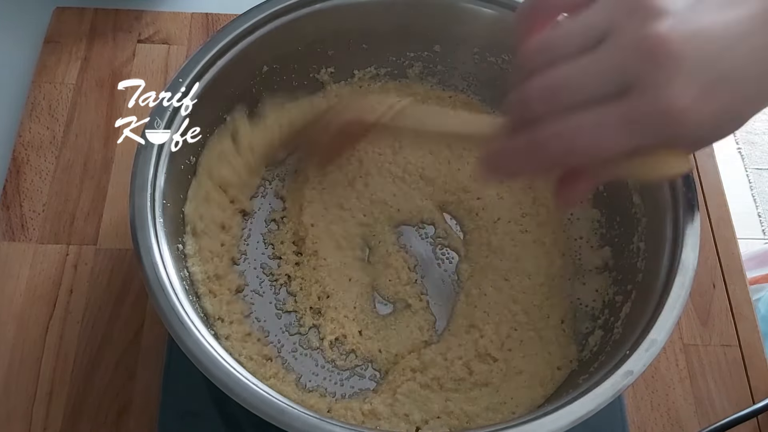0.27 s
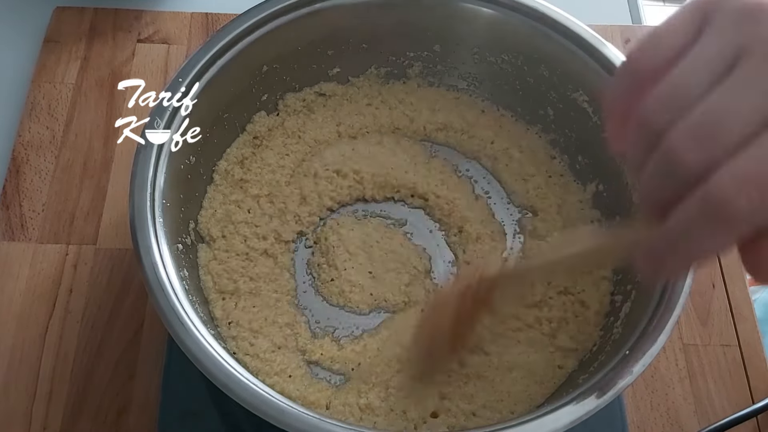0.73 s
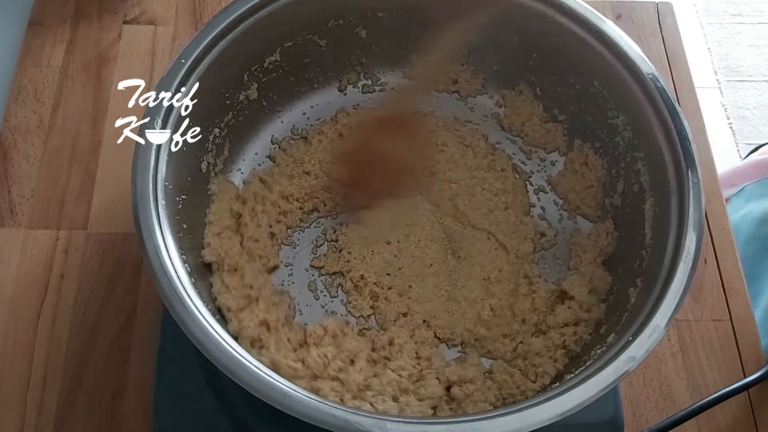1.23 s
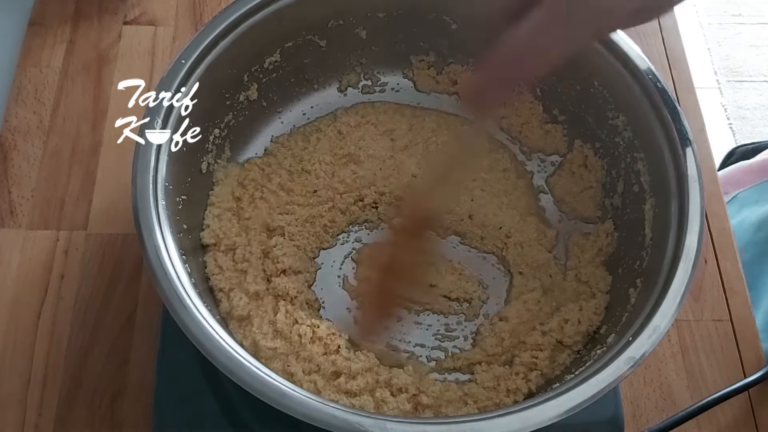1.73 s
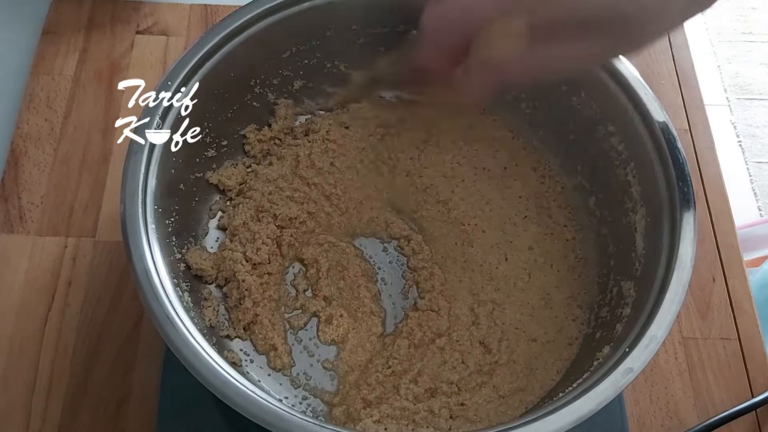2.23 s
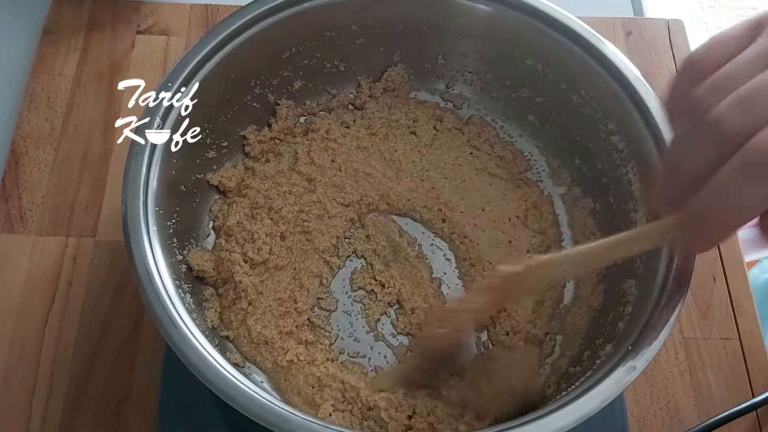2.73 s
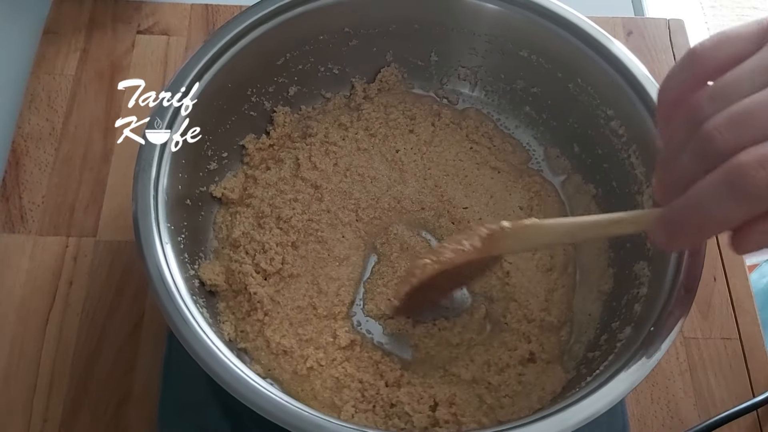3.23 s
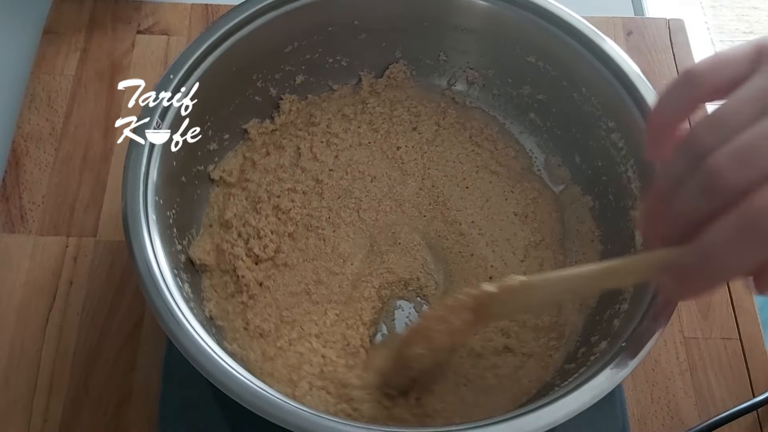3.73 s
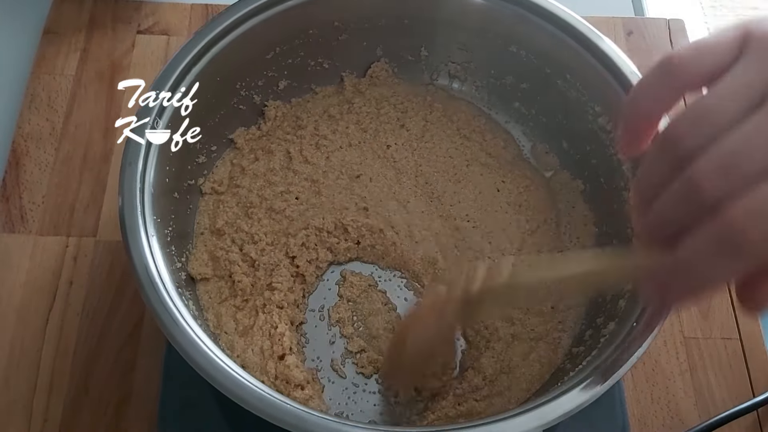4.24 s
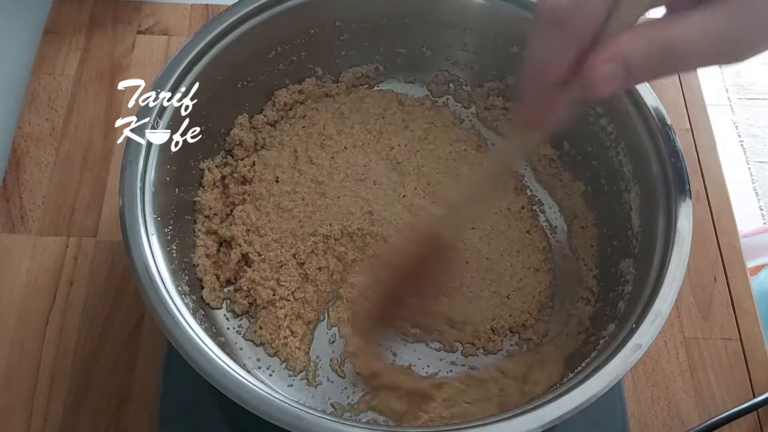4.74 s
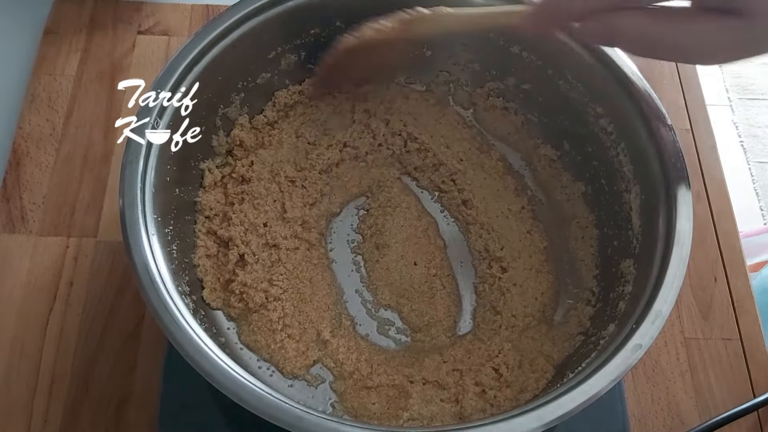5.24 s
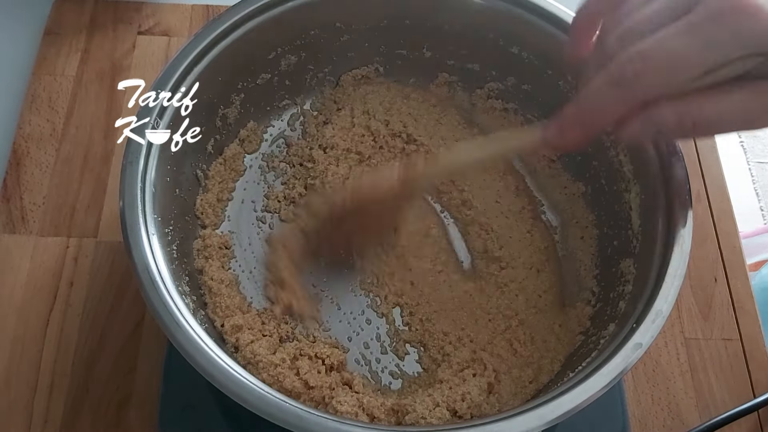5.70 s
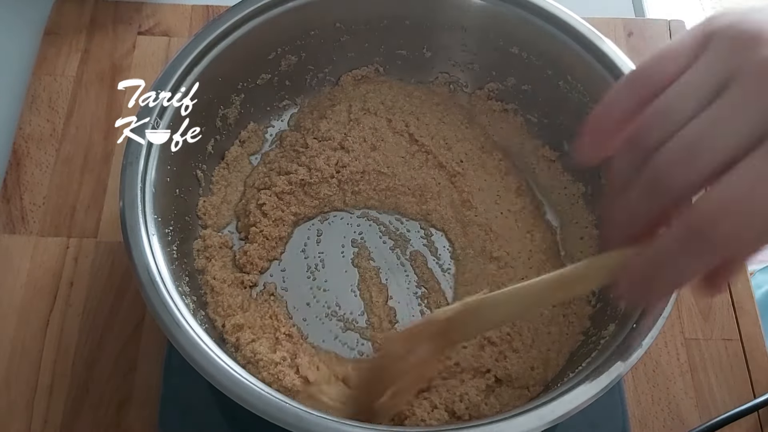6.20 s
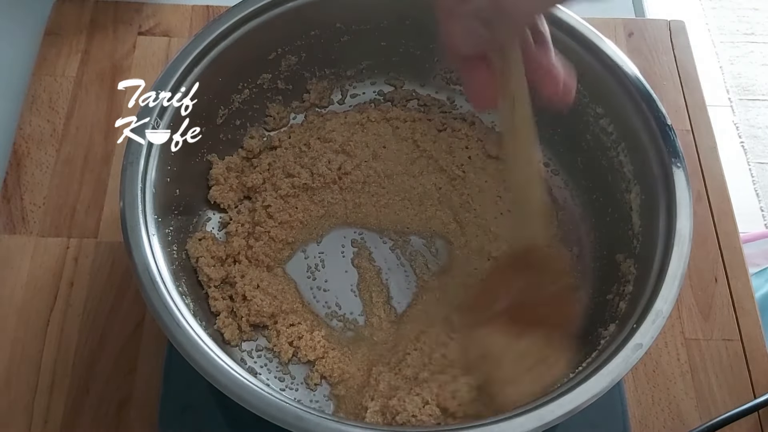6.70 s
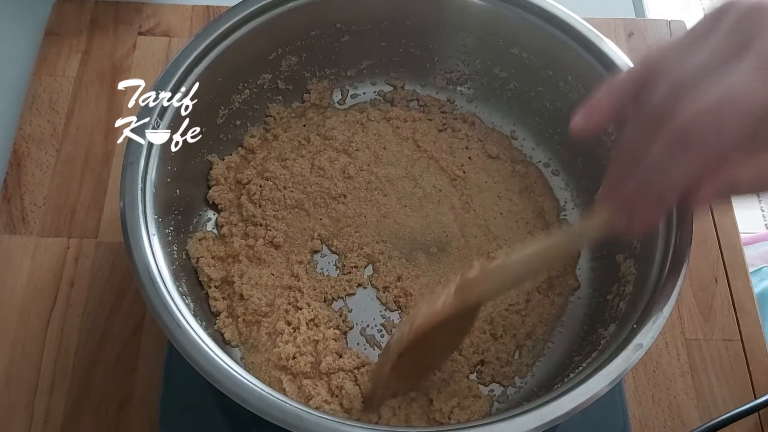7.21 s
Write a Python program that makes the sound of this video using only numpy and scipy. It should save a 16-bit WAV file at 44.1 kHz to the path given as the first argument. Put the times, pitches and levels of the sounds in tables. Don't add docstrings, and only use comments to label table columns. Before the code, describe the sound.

A wooden spoon stirs crackling grain in a steel pot, with soft thuds and two sharp clacks over a steady gas hiss.

```python
import sys
import numpy as np
from scipy import signal
from scipy.fft import rfft, irfft, next_fast_len
from scipy.io import wavfile
from scipy.ndimage import uniform_filter1d

SR = 44100
rng = np.random.default_rng(int(sys.argv[2]) if len(sys.argv) > 2 else 0)


def dump(signal):
    limited = np.clip(np.atleast_2d(signal).T, -1, 1)
    pcm = np.round(limited * 32767).astype(np.int16)
    wavfile.write(sys.argv[1], SR, pcm)


def nominal_scale(level):
    x = np.asarray(level, float) / 20
    return 10 ** x


N = 328986
T = np.arange(N) / SR

# (frequency [Hz], density [dB per Hz])
GAS_SPECTRUM = [(30, -40), (60, -17), (115, -10.5), (300, -5), (600, -13.5), (1000, -36), (3000, -31),
                (6000, -21.5), (15800, -20.5)]
# (frequency [Hz], bandwidth [Hz], level [dB])
JET_WHISTLES = [(1820, 520, -6.5), (4260, 480, -4), (7400, 130, 8.5), (11600, 3000, -5), (14240, 500, -5)]
# (frequency [Hz], density [dB per Hz])
SIZZLE_SPECTRUM = [(1500, -30), (4000, -9), (6000, 1), (9000, -5), (15000, -10)]
# (time [s], peak [dB], length [ms])
PUFFS = [(1.12, -34.5, 24), (1.214, -32, 39), (1.254, -29.5, 23), (1.331, -33, 15), (1.342, -26.5, 24),
         (1.378, -25.5, 21), (1.414, -22, 29), (1.429, -31, 40), (1.56, -37.5, 29), (1.64, -28, 33),
         (1.665, -24.5, 24), (1.69, -32.5, 26)]
# (frequency [Hz], density [dB per Hz])
CRACKLE_SPECTRUM = [(300, -4.5), (600, -13), (1000, -14), (1500, -7), (2500, -7), (4300, -3.5), (6500, -1),
                    (8700, -3.5), (12500, -0.5), (15800, -5)]
# (frequency [Hz], density [dB per Hz])
CRACK_SPECTRUM = [(500, -34), (1500, -18), (3000, -18), (4000, -15), (4650, -21), (5400, -5.5), (7000, 2),
                  (8000, -4.5), (9000, -11.5), (12000, -14), (16500, -19.5)]

# (frequency [Hz], level [dB], t60 [s])
HOB_MODES = [(61.7, -24, 0.13), (99.2, 0.5, 0.23), (127.6, -3.5, 0.27), (185.1, -12, 0.3)]
# (frequency [Hz], level [dB], t60 [s])
BOTTOM_MODES = [(135.7, 1.5, 0.18), (275, -17.5, 0.64), (313.7, 0, 0.22), (357, -4, 0.24),
                (419, -5.5, 0.17), (537, -4.5, 0.25), (610, -4, 0.15), (712, -8.5, 0.23),
                (828, -11.5, 0.23)]
# (frequency [Hz], level [dB], t60 [s])
WALL_MODES = [(630, 0, 0.019), (735, -5.5, 0.022), (960, -11, 0.014), (1204, 1, 0.013), (1496, -8.5, .04),
              (1691, -3, 0.021), (1950, -6.5, 0.016), (2270, -8.5, 0.024), (2730, -0.5, 0.01)]
# (frequency [Hz], level [dB], t60 [s])
RIM_MODES = [(1490, -23, 0.23), (2360, -14, 0.22), (2550, -8, 0.08), (3300, -14, 0.12), (3740, -14, 0.12),
             (4050, -11, .06), (5040, -12.5, 0.097), (5450, -3, 0.083), (6340, 14, 0.08), (6780, 10, 0.11),
             (7700, -10, .08), (7040, 6, 0.08)]
# (frequency [Hz], level [dB], t60 [s])
BELL_MODES = [(851, -8, 0.57), (1330, -8.5, 0.3), (1475, -3, 0.46), (1780, -5, .26), (2355, 3.5, .47),
              (2570, -13, 0.42), (2950, -14, .3), (3246, -2, 0.35), (3666, -3, 0.12), (4050, -5, 0.45)]

# (time [s], peak [dB], deep mode [dB], upper modes [dB], decay stretch [ratio])
THUDS = [(0.303, -31, -25, -23, 1.2), (0.901, -26, -31, -9, 0.85), (0.929, -27.5, -17.5, -11, 0.99),
         (1.426, -29.5, -12, -15, 0.87), (1.475, -24.5, -6.5, -7.5, 1), (1.504, -30, -22, -14, 1.1),
         (2.228, -35, -20, -6, 1.5), (2.668, -32.5, -24, -5.5, 0.83), (3.261, -21.5, -9, -32, 1.2),
         (4.383, -23.5, -12, -3, 1), (4.409, -22, -20, -14, 1.6), (5.347, -40, -28, -9.5, 1.4),
         (5.369, -29, -21, -16.5, 1.2), (6.314, -23, -18, -29, 0.76), (6.339, -28, -26, -16.5, 1.15),
         (7.33, -31, -19, -21, 0.89)]
# (time [s], peak [dB], deep mode [dB], upper modes [dB])
TOUCHES = [(0.335, -35, -26, -11), (1.225, -37, -2.5, -10), (3.459, -39.5, -12, -15),
           (3.529, -38.5, -24, -19), (3.684, -42, -7, -6), (3.84, -36, -10, -21), (4.136, -40.5, -11, -20),
           (4.717, -32, -8, -12), (5.441, -38, -22, -18), (5.472, -39, -18, -15), (5.974, -37.5, -20, -34),
           (6.021, -38.5, -27, -21), (6.528, -33, -27, -13.5), (6.676, -38, -16, -14.5),
           (7.354, -35, -15, -30)]
# (time [s], peak [dB], tail [dB], ring [dB])
CLACKS = [
    (4.3797, -14, -5.5, -9),
    (5.3418, -13, -12.5, -18),
    (6.306, -33.5, -14, -8),
]
# (time [s], level re strike [dB], length [ms], pitch [Hz])
BOUNCES = [(4.3793, -1, .5, 7200), (4.3815, -2, 1.0, 5900), (4.3848, 0, 1.8, 6700), (4.3875, -5, .8, 6200),
           (4.3893, -3, .7, 7000), (4.3962, -7, 1.2, 6000), (5.3420, -6, .6, 6300), (5.3430, 0, .7, 7300),
           (5.3459, -2, .7, 6400), (5.3470, -4, .6, 7400), (5.3505, -13, 1.0, 6400), (5.354, -13, .8, 7000),
           (5.3565, -12, .9, 6500), (6.3072, 0, 1.5, 7200)]
# (time [s], peak [dB])
CHIMES = [
    (4.38, -45),
    (5.343, -36.5),
    (6.307, -43.5),
]
# (time [s], peak [dB], pitch [Hz], treble [dB])
SCUFFS = [(0.115, -35, 1500, -45), (0.183, -33, 1820, -48), (0.346, -49, 620, -32),
          (0.414, -34.5, 720, -32), (0.451, -40, 630, -45), (0.702, -38, 654, -44), (0.792, -32, 1950, -44),
          (1.313, -36, 1950, -48), (1.453, -36.5, 607, -39), (1.575, -34, 2980, -45.5),
          (2.195, -42, 564, -64), (2.25, -38, 587, -54), (3.916, -39.5, 2400, -56), (4.211, -45, 604, -57),
          (4.799, -37.5, 644, -36), (4.955, -47, 724, -35), (5.745, -54, 3260, -35),
          (7.315, -55, 630, -37.5), (1.605, -38, 2700, -47), (4.7, -44, 2000, -34), (4.82, -40, 1300, -48)]
# (time [s], peak [dB], pitch [Hz], treble [dB])
TICKS = [(0.5420, -30.5, 1710, -28), (0.9005, -29.5, 660, -50), (2.3136, -38, 1280, -46),
         (2.6658, -34.5, 2700, -29.5), (6.3041, -35, 2200, -32), (7.1481, -32.5, 4500, -28.5),
         (7.149, -37, 2520, -53), (5.744, -38, 3250, -42), (4.9566, -40, 5850, -38), (.416, -36, 1290, -45),
         (.452, -37, 690, -42), (.190, -37, 1940, -45), (2.234, -42, 700, -42), (1.454, -37, 2550, -38),
         (2.668, -37, 610, -45)]
# (time [s], peak [dB], pitch [Hz], treble [dB])
CRUNCHES = [
    (2.1905, -35, 6100, -67),
    (2.44, -37, 4500, -53),
    (2.5656, -46, 4930, -60),
    (6.6894, -40, 6500, -66),
]
# (time [s], peak [dB], pitch [Hz], treble [dB])
DRAGS = [(.715, -35.5, 650, -44), (.72, -43, 2200, -50), (.13, -40, 1060, -50), (.555, -39, 630, -50),
         (0.33, -41, 1370, -48), (.908, -40, 1230, -60), (.795, -36, 1950, -48), (.185, -37, 1900, -50),
         (.79, -41, 650, -55), (.35, -41, 2700, -48), (.125, -42, 650, -55)]
# (time [s], length [s], peak [dB], pitch [Hz], glide [share])
RUBS = [
    (2.425, .04, -39.5, 4300, .07),
    (1.9, .035, -47, 4100, 0.016),
    (2.565, .02, -45, 4850, .02),
    (5.12, .17, -43.5, 96, 0.01),
    (3.265, .09, -43, 61, -.1),
    (4.7, 0.084, -42, 91, 0.01),
    (0.23, 0.046, -42, 380, 0.01),
    (5.368, .045, -30, 312, 0.01),
    (.945, .035, -37, 312, .01),
]

# (time [s], level [dB])
PRESSURE = [(0, -68), (.25, -60), (.36, -51.5), (.75, -60.5), (.93, -49), (1.46, -54.5), (1.6, -53),
            (2.15, -55), (2.45, -52), (3.0, -57.5), (3.5, -49), (4.3, -53.5), (4.45, -46), (5.1, -60),
            (5.5, -53.5), (6.1, -56), (6.45, -48), (7.46, -60.5)]
# (time [s], length [s], level [dB])
ROCKS = [(1.127, 0.08, -45), (1.45, 0.2, -41.5), (1.68, 0.37, -49), (2.43, 0.3, -49.5), (2.887, 0.32, -49),
         (3.304, 0.1, -44.5), (3.443, 0.22, -52), (3.72, 0.29, -55), (3.9, 0.1, -47.5), (4.186, 0.27, -52),
         (4.45, 0.16, -46), (4.8, 0.19, -47.5), (5.19, 0.24, -52.5), (5.432, 0.15, -49), (5.528, 0.28, -52),
         (6.084, 0.22, -55), (6.297, 0.071, -51), (6.55, 0.45, -56.5), (6.778, 0.14, -48),
         (7.1, 0.21, -55.5)]
# (time [s], length [s], crackle [dB], wall rasp [dB], change over sweep [dB])
SWEEPS = [(-.03, 0.11, -53, -57, 4), (0.081, 0.12, -49.5, -44.5, 0.5), (0.275, 0.28, -45, -48, -2),
          (0.544, 0.16, -50.5, -51.5, 4.5), (0.696, 0.15, -48, -47, 0), (0.863, 0.27, -47.5, -55, 0),
          (1.104, 0.38, -43.5, -51, 2.5), (1.53, 0.2, -45, -54.5, -5), (1.742, 0.12, -50.5, -64, 5),
          (1.838, 0.19, -44.5, -51.5, 1.5), (2.154, 0.33, -44, -51.5, 5), (2.5, 0.16, -49, -59, 2),
          (2.655, 0.22, -49.5, -54, 0.5), (3.862, 0.32, -54, -58.5, -2.5), (4.346, 0.43, -44, -49, 0.5),
          (4.81, 0.32, -47.5, -54, -5.5), (5.326, 0.16, -45.5, -49.5, -1.5), (5.49, 0.25, -52, -62.5, 2.5),
          (5.718, .38, -49.5, -62.5, -5), (6.152, 0.15, -52, -58.5, 3), (6.362, 0.27, -47, -55.5, 8),
          (6.627, 0.28, -48, -57, -11), (7.02, .13, -50, -66, 1), (7.295, 0.12, -52, -59, 5)]
# (time [s], length [s], crackle [dB], wall rasp [dB])
NUDGES = [(0.025, 0.026, -48, -62), (2.846, .03, -46.5, -66), (3.44, 0.14, -64, -65),
          (3.545, 0.03, -57, -60), (3.64, .03, -65, -60), (3.71, .03, -56.5, -64), (3.774, 0.028, -59, -56),
          (4.144, 0.078, -48.5, -50.5), (4.86, 0.027, -56, -59), (4.962, 0.046, -51, -48.5),
          (5.118, 0.024, -50, -67), (6.059, 0.037, -53, -51.5), (6.274, 0.04, -46.5, -47)]
# (time [s], depth [dB], width [ms])
SCENE_CHANGES = [
    (1.103, -14, 12),
    (2.176, -12, 12),
    (5.465, -12, 14),
    (7.017, -14, 14),
]


def level(x, db):
    return x * nominal_scale(db) / np.sqrt(np.mean(x ** 2))


def colour(x, points):
    hz, db = np.transpose(points)
    size = next_fast_len(x.shape[-1])
    f = np.maximum(np.arange(size // 2 + 1) * SR / size, 1)
    gain = nominal_scale(np.interp(np.log(f), np.log(hz), db))
    return irfft(rfft(x, size) * gain, size)[..., :x.shape[-1]]


def walk(rate_hz):
    hold = int(SR / rate_hz)
    steps = np.repeat(rng.standard_normal(N // hold + 1), hold)
    return 1.45 * uniform_filter1d(uniform_filter1d(steps, hold), hold)[:N]


def ring(x, modes, spread_rad_per_khz, stretch=0.84, detune=0.):
    out = np.zeros((2, len(x)))
    chance = rng.standard_normal((len(modes), 3))
    for (hz, db, t60_s), (turn, drift, start) in zip(modes, chance):
        decay = np.log(1000) / (t60_s * stretch * SR)
        pole = np.exp(2j * np.pi * hz * (1 + detune * drift) / SR - decay)
        z = signal.lfilter([np.exp(.7j * start)], [1, -pole], x)
        lean = np.exp(1j * spread_rad_per_khz * hz / 1000 * turn)
        out += nominal_scale(db) * np.imag([z * lean, z / lean])
    return out


def grains(per_s, scatter_db):
    hit = rng.random(N) < per_s / SR
    size_db = scatter_db * np.minimum(rng.exponential(size=N), 4.5)
    return hit * rng.standard_normal(N) * nominal_scale(size_db)


def bowl(x, tail_ms):
    power = signal.lfilter([1], [1, -np.exp(-2000 / (tail_ms * SR))], x ** 2)
    return np.sqrt(power) * rng.standard_normal((2, len(x)))


def add(out, start_s, sound, peak_db):
    i = int(start_s * SR)
    sound = sound[:, :N - i]
    out[:, i:i + sound.shape[1]] += sound * nominal_scale(peak_db) / np.max(np.abs(sound.mean(0)))


def burner():
    gas = rng.standard_normal((2, N))
    whistles = np.zeros((2, N))
    for hz, width_hz, db in JET_WHISTLES:
        band = signal.lfilter(*signal.iirpeak(hz, hz / width_hz, SR), gas)
        whistles += nominal_scale(db) * band * nominal_scale(1.6 * walk(8))
    hiss = colour(rng.standard_normal((2, N)), GAS_SPECTRUM)
    return level(whistles, -54) + level(hiss, -53.0)


def sizzle():
    bubbles = bowl(grains(45, 3.0), tail_ms=4.0)
    return level(colour(bubbles, SIZZLE_SPECTRUM), -62)


def draught():
    eddy_hz = 87.5
    side_gain = np.array([[.12], [1]])
    out, t = np.zeros((2, N)), T[:int(.2 * SR)]
    for s, db, length_ms in PUFFS:
        window = np.sin(np.pi * np.clip(t * 1000 / length_ms, 0, 1)) ** 2
        phase = 2 * np.pi * (eddy_hz * t + rng.random())
        phase = phase + np.array([[2 * np.pi * rng.random()], [0]])
        eddy = np.sin(phase) + 0.26 * np.sin(2 * phase + 1.6)
        add(out, s - .009, side_gain * window * eddy, db)
    return out


def chimes(out):
    tap = np.exp(-T[:int(.4 * SR)] / .0001)
    for s, db in CHIMES:
        add(out, s, ring(tap, BELL_MODES, 0.41, 1., 0.0011), db)


def rubs(out):
    for s, length_s, db, hz, glide in RUBS:
        along = T[:int(.2 * SR)] / length_s
        jitter = uniform_filter1d(rng.standard_normal(len(along)), size=90)
        waver = 1 + 6 * min(hz / 4000, 1) * jitter
        phase = 2 * np.pi * hz * length_s * (along + glide * along ** 2 / 2) + rng.random((2, 1))
        add(out, s, np.sin(np.pi * np.minimum(along, 1)) * waver * np.sin(phase), db)


def scuffs(out):
    t_ms = T[:int(.16 * SR)] * 1000
    # (events, length [ms], rise [ms])
    kinds = (SCUFFS, 19, 7.7), (TICKS, 8.5, 0.23), (CRUNCHES, 51, 6.3), (DRAGS, 16, 16)
    for events, length_ms, rise_ms in kinds:
        shape = (1 - np.exp(-(t_ms / rise_ms) ** 2)) * np.exp(-t_ms / length_ms)
        for s, db, hz, treble_db in events:
            grit = rng.standard_normal((5, len(t_ms))) * shape
            start_s = s - 0.55 * rise_ms / 1000
            patch = signal.iirpeak(hz, 3.2, SR)
            pitched = signal.lfilter(*patch, signal.lfilter(*patch, grit[:2]))
            add(out, start_s, pitched, db - 3.5)
            wall = ring(grit[2], WALL_MODES, 1.03, 0.79, 0.023)
            add(out, start_s, wall, min(db, treble_db + 9) - 7)
            spray = signal.lfilter([1, -.8], [1], grit[3:])
            add(out, start_s, spray, treble_db + 2)


def clacks(out):
    t = T[:int(.3 * SR)]
    for s, db, tail_db, ring_db in CLACKS:
        start_s = s - .0008
        chatter, pings = 0, 0
        for bounce_s, bounce_db, ms, hz in BOUNCES:
            late = t + start_s - bounce_s
            bounce = nominal_scale(bounce_db) * np.exp(-(late * 1000 / ms) ** 2)
            chatter = chatter + bounce
            pings = pings + bounce * np.sin(2 * np.pi * hz * late + [[.7], [-.7]])
        tail = np.exp(-t / 0.018) + 0.31 * np.exp(-t / 0.11)
        shape = 0.35 * chatter + nominal_scale(tail_db) * tail
        noise = rng.standard_normal((2, len(t))) + 0.65 * rng.standard_normal(len(t))
        hiss = level(colour(noise, CRACK_SPECTRUM), 0)
        add(out, start_s, pings + hiss * shape, db)
        blow = rng.standard_normal(len(t)) * np.exp(-t / 0.00043)
        add(out, start_s, ring(blow, RIM_MODES, 0.37, 1.0, 0.0012), db + ring_db)


def thuds(out):
    touch_stretch, neighbour_stretch, upper_stretch = 0.97, 0.68, 0.54
    lean_db, slump_s = 0.9, 0.074
    t = T[:int(.35 * SR)]
    push = np.exp(-((t - .001) / 0.00042) ** 2)
    slump = 1 / (1 + (t / slump_s) ** 4)
    pan = nominal_scale([[lean_db / 2], [-lean_db / 2]])
    for s, db, deep_db, upper_db, stretch in THUDS + [touch + (touch_stretch,) for touch in TOUCHES]:
        deep = nominal_scale(deep_db + 5) * ring(push, BOTTOM_MODES[:1], 1.0, stretch, 0.0099)
        deep = deep * (1 - np.exp(-t / 0.011))
        body = ring(push, BOTTOM_MODES[1:3], 1.27, stretch, 0.0047)
        body = body + ring(push, BOTTOM_MODES[3:5], 1.25, neighbour_stretch, 0.01)
        body = body * (1 - np.exp(-t / 0.0042))
        upper = ring(push, BOTTOM_MODES[5:], 1.88, upper_stretch * stretch, 0.022)
        upper = nominal_scale(upper_db + 10.0) * upper * (1 - np.exp(-t / 0.0025))
        add(out, s - .003, (deep + body + upper) * slump * pan, db)


def knocks():
    out = np.zeros((2, N))
    for add_contacts in thuds, clacks, scuffs, chimes, rubs:
        add_contacts(out)
    return out


def strokes(level_column, fall_s, sag_db_per_s):
    rise_s = 0.029
    power = 0
    for row in SWEEPS + [nudge + (0,) for nudge in NUDGES]:
        s, length_s, change_db = row[0], row[1], row[-1]
        t = np.maximum(T - s, 0)
        shape = (1 - np.exp(-(t / rise_s) ** 2)) * np.exp(-np.maximum(t - length_s, 0) / fall_s)
        along = np.minimum(t / length_s, 1) - .5
        stroke_db = row[level_column] + (change_db + sag_db_per_s * length_s) * along
        power = power + (shape * nominal_scale(stroke_db)) ** 2
    return np.sqrt(power)


def stirring():
    turning = strokes(2, fall_s=0.064, sag_db_per_s=0)
    scraping = strokes(3, fall_s=0.064, sag_db_per_s=-6)
    pressure_db = np.interp(T, *np.transpose(PRESSURE))
    rocking = nominal_scale(-59.5)
    for s, length_s, db in ROCKS:
        rocking = rocking + nominal_scale(db) * np.exp(-((T - s) * 2 / length_s) ** 2)
    surge = walk(18)

    crackle = colour(bowl(grains(6000, 0.32), tail_ms=0.984), CRACKLE_SPECTRUM)
    air_band = signal.lfilter(*signal.iirpeak(5200, 2.2, SR), crackle)
    crackle += (nominal_scale(1.35 * walk(16)) - 1) * air_band
    rasp = ring(grains(2500, 0.76), WALL_MODES, 0.93)
    rasp = rasp + ring(grains(2500, 2.4), WALL_MODES, 1.86, 0.29, 0.046)
    drag = ring(grains(500, 2.43), BOTTOM_MODES[1:5], 1.0, 0.52)
    hob = ring(grains(900, 1.36), HOB_MODES, 1.5)

    out = level(crackle, 4.02) * turning * nominal_scale(0.5 * surge + 0.7 * walk(40))
    out += level(rasp, 0.0) * scraping * nominal_scale(0.61 * surge + 1.8 * walk(25))
    out += level(drag, 0.15) * nominal_scale(pressure_db + 1.37 * walk(16))
    return out + level(hob, 0.25) * rocking


def scene():
    left_lean_db = -1.4
    bass_cut = signal.butter(3, 62, "high", fs=SR, output="sos")
    pot = signal.sosfilt(bass_cut, stirring() + knocks() + burner())
    return pot * nominal_scale([[left_lean_db / 2], [-left_lean_db / 2]]) + draught() + sizzle()


def top_cut(x):
    return signal.sosfilt(signal.butter(12, 16810, fs=SR, output="sos"), x)


def record(dry):
    dip_db = sum(db * np.exp(-((T - s) * 2000 / ms) ** 2) for s, db, ms in SCENE_CHANGES)
    mix = signal.sosfilt(signal.butter(2, 40, "high", fs=SR, output="sos"), dry)
    mix = signal.sosfilt(signal.ellip(10, .2, 36, 15830, fs=SR, output="sos"), mix)
    return top_cut(mix * nominal_scale(dip_db))


dry = scene()
out = record(dry)
dump(out)
```